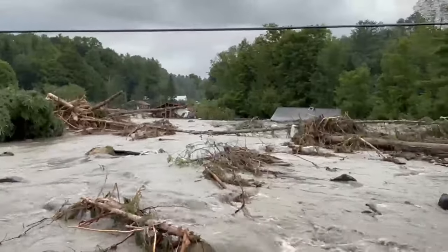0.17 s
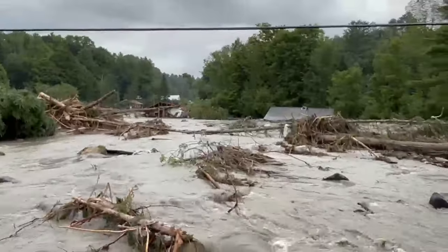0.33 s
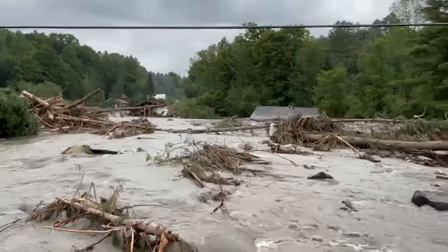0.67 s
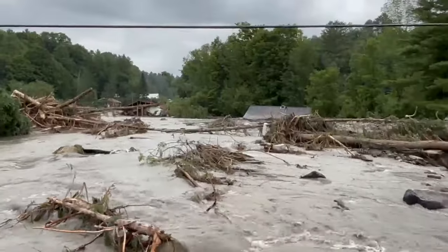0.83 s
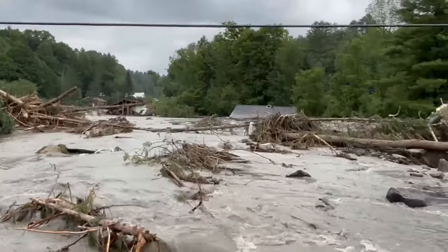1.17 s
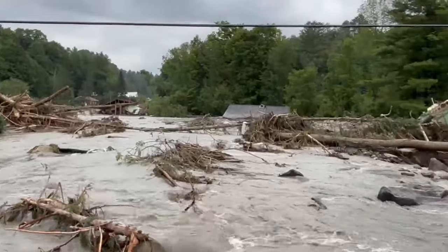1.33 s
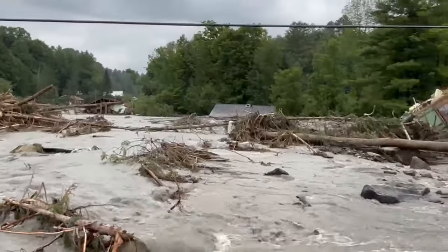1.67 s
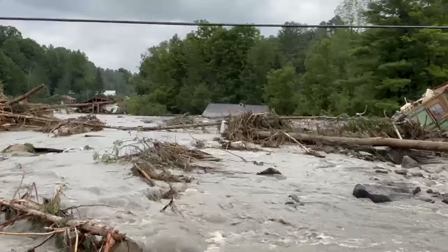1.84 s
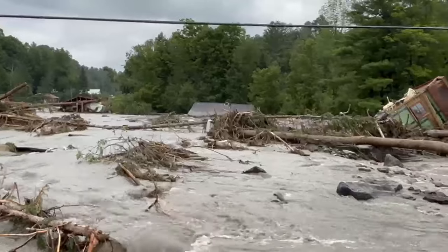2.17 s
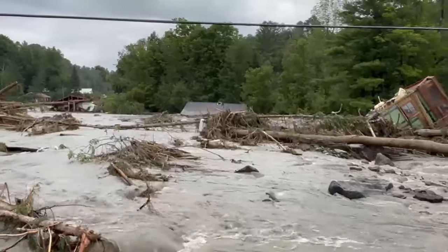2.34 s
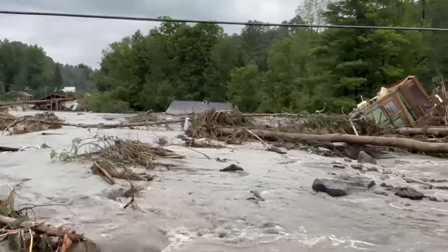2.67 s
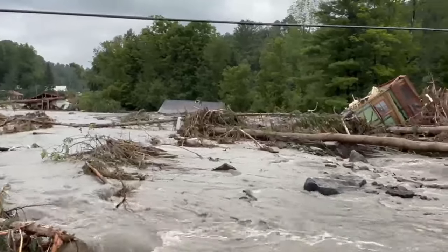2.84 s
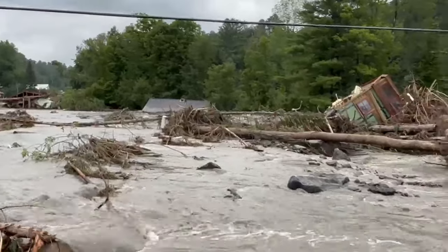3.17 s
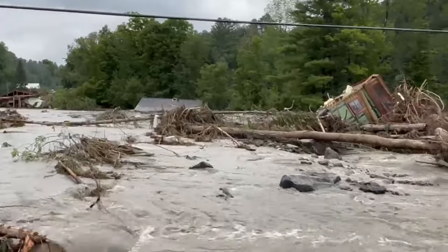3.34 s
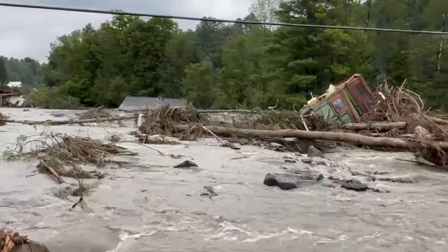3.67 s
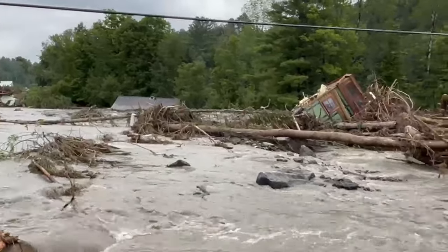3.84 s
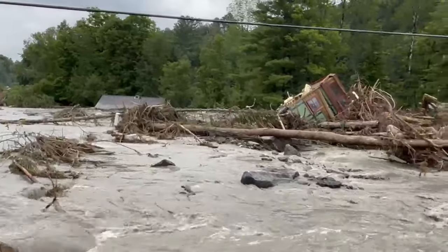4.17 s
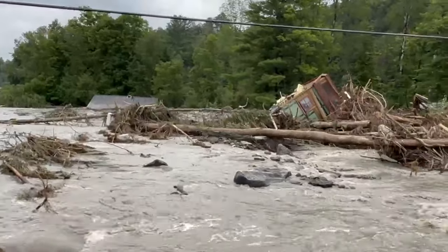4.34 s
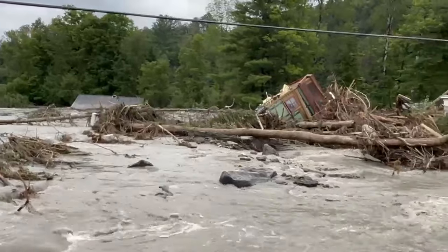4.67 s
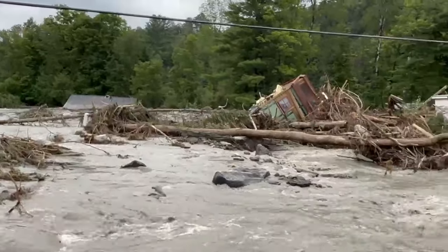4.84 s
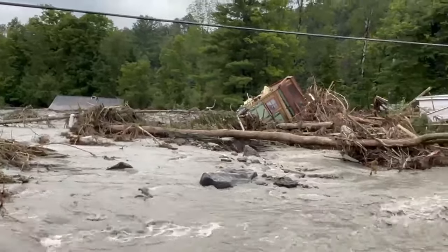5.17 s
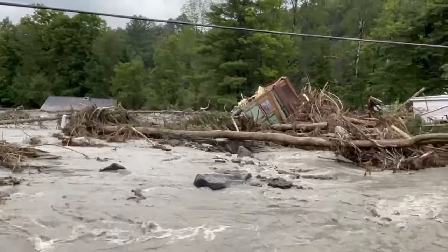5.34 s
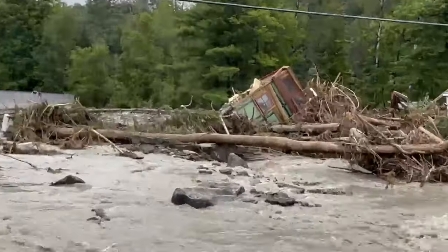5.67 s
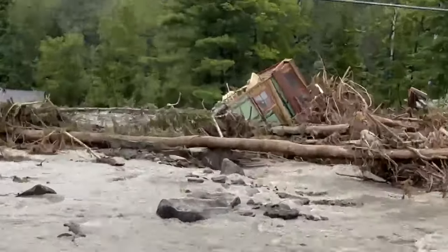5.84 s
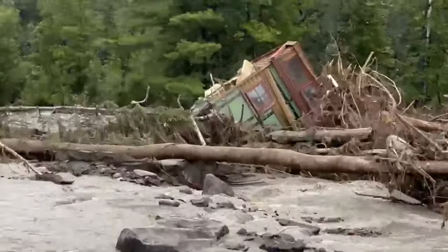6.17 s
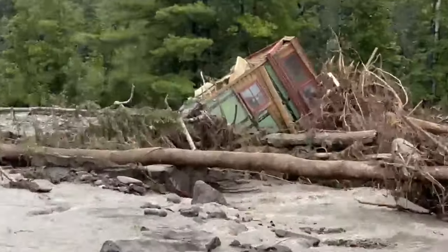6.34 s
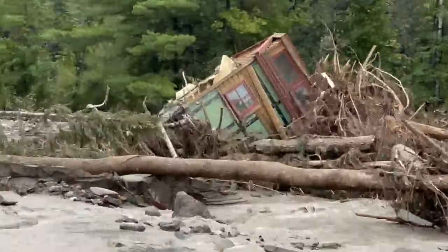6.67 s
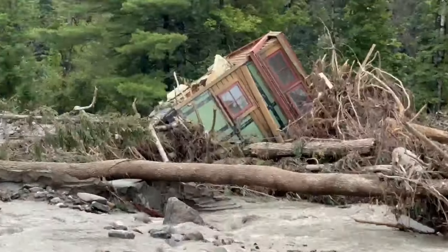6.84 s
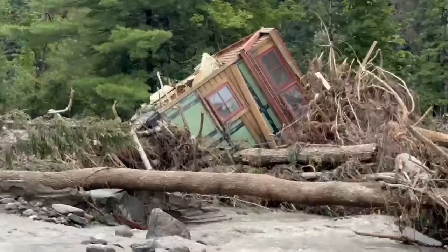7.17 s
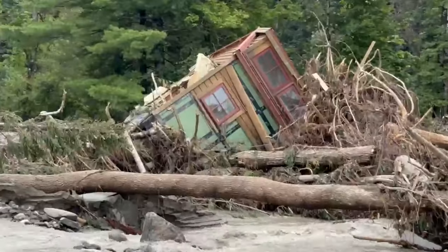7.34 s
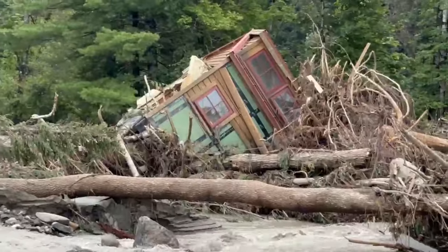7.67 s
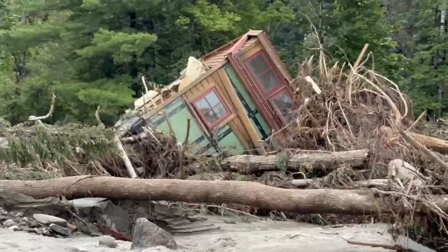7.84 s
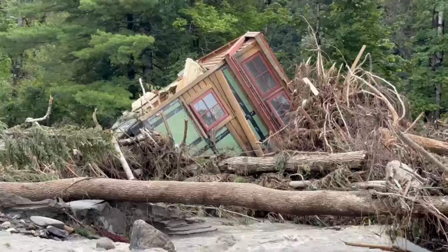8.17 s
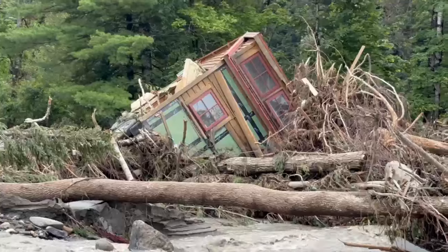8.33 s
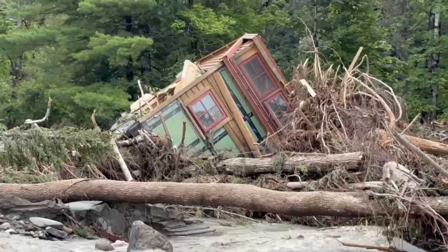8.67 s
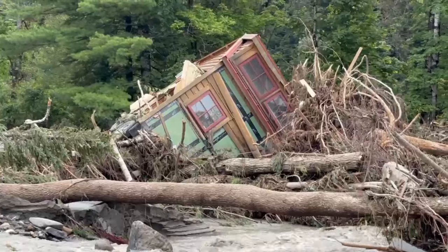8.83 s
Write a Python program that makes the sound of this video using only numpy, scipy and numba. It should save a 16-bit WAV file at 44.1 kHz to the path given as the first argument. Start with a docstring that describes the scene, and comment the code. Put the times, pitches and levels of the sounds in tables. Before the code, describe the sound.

Outdoors on the bank of a flooded street, a handheld phone in stereo captures dense, continuous water hiss with fine bubbling, gurgles, occasional plops and tiny snapping drops. Low wind rumbles on the microphone, bursting into heavy thumps just before three seconds and hardest around seven. Midway the water's image narrows toward the centre and its upper hiss grows clearer.

```python
"""A dense hiss of flood water rushing through debris, from the bank on a hand-held phone with two ports.
The rush is flickering noise with bursting bubbles; gurgles, plops, snaps and thicker patches are dying sines.
Gusts rumble and flutter on the ports as band-passed noise; single eddies thump as sinking sines.
Midway the phone narrows its hearing to the front: the middle treble rises and moves to the centre."""
import sys
import numpy as np
from scipy import signal
from scipy.fft import rfft, irfft, next_fast_len
from scipy.io import wavfile
from scipy.ndimage import uniform_filter1d
from numba import njit

SR = 44100
rng = np.random.default_rng(int(sys.argv[2]) if len(sys.argv) > 2 else 0)


def log_audio(samples):
    """Write samples as a 16-bit WAV file to the path given in sys.argv[1]."""
    # one column per channel
    frames = np.atleast_2d(samples).T
    # limit to full scale, then quantise
    limited = np.clip(frames, -1, 1)
    pcm = np.round(limited * 32767).astype(np.int16)
    wavfile.write(sys.argv[1], SR, pcm)


N = 396880

# single eddies that hit the ports: t/s, peak level/dB, final f/Hz, starting excess as share of f (below 0: none),
# rise to peak/ms, slap level/dB relative to the peak
EDDY_HITS = [(0.54, -31, 74, -1.5, 16, -3), (0.756, -17, 92, 0.5, 10.6, -13), (0.801, -23, 74, 0, 14, -10),
             (0.955, -25, 58, -10, 17, -14), (1.26, -28, 51, 0.5, 17, -5),
             (1.419, -24, 59.3, 2.5, 4.4, -13), (1.64, -33, 70, 2.5, 10, -10),
             (1.72, -27, 75, 1.5, 14, -12), (1.793, -18, 64, 0.5, 12, -12), (2.48, -11.5, 65, 2.0, 14, 0),
             (2.564, -17.5, 58, 3.5, 7, -7), (2.606, -20, 70, -1, 11, -12),
             (2.681, -9.5, 57.6, 4, 5.1, -11), (2.706, -9, 146, 1, 6.6, -9), (2.72, -11, 56, 0.5, 9.2, -16),
             (2.763, -15, 106, 0, 5.4, -20), (2.8, -17, 58, 0.5, 11, -13), (2.849, -21, 74, 1, 12, -15),
             (2.888, -11.5, 65, 0.5, 6.4, -24), (2.932, -20, 50.7, 2.0, 11, -11),
             (2.973, -16.7, 58, 2.5, 8, -6), (3.003, -13, 45, 3, 8.7, -8), (3.071, -23, 65, 4, 5.4, -12),
             (3.113, -23.5, 65, 3, 5.7, -15), (3.177, -25, 106, -1.5, 5, -1), (3.232, -26, 85, 2, 5.1, 0),
             (3.322, -28, 70, 4, 4.1, 2), (3.474, -25, 95, 0, 6.6, -6), (3.579, -27, 65.6, 3, 5, 7),
             (3.752, -25, 74, 4, 5, -11), (4.213, -29, 85, 1.5, 7, 6), (4.235, -32, 75, 0.5, 9, -1),
             (4.262, -18, 50, 4, 6.6, -11), (4.3, -30, 106, 0.5, 5, 5), (4.393, -22.5, 100, -1, 5.5, 2),
             (4.421, -25, 83, 3.0, 7.9, -11), (4.444, -30, 106, -1, 5, -3), (4.518, -28.3, 106, 0.5, 5, -4),
             (5.359, -27, 100, 0.5, 5.2, -4), (5.406, -25, 110, 0.5, 5, -7), (5.45, -34, 70, 1.5, 8, -3),
             (5.749, -24, 74, 0.0, 6.3, -11), (5.82, -26, 80, 2, 5, 0), (5.858, -24.5, 74, 1, 9.1, -8),
             (5.9, -30, 85, 0.5, 7, -6), (5.98, -28, 90, 1.5, 7.4, -4), (6.024, -26, 62, -0.5, 12, 3),
             (6.058, -28, 65, -1, 7, -8), (6.235, -26, 100, 1, 5, -2), (6.27, -27, 65, 1, 8, -6),
             (6.505, -21.5, 74.7, 3.5, 13, -10), (6.53, -17, 72.5, 5, 11.3, -3),
             (6.565, -20, 64.5, 2.0, 17, -16), (6.614, -18.5, 58, 3.0, 11, -11),
             (6.7, -24, 51, 2.5, 5, -11), (6.808, -12, 52, 2.2, 10, -10), (6.834, -11, 51, 3.5, 14, 2.5),
             (6.849, -13.5, 60, 1.5, 11, -5), (6.876, -11.5, 70, 2.5, 8.2, -7),
             (6.927, -24, 90, 1.5, 12, -3), (6.962, -17, 55, 1, 10, -16), (6.99, -12, 58, 2.5, 4.1, -4),
             (7.001, -12, 59, 4, 8.4, -10), (7.008, -2.5, 44, 3, 9.1, -15), (7.022, -12, 44, 0.7, 11, -20),
             (7.044, -17, 80, 1, 7, -5), (7.066, -13, 110, 0.5, 4.5, -2),
             (7.076, -10.5, 49.7, 5.5, 12.6, 7.5), (7.096, -11, 120, 1.5, 5.1, 0),
             (7.116, -17.5, 86, 0.5, 12, -10), (7.15, -24, 110, 0.5, 4.5, -10),
             (7.16, -16, 52, 0.5, 11, -17.5), (7.191, -7.5, 106, 1.0, 5, -8), (7.222, -16.5, 105, 2, 12, 3),
             (7.262, -16.5, 135, 2, 3.8, -6), (7.302, -29.5, 64.7, 2, 15, 9), (7.33, -26, 90, 1.5, 7.7, -1),
             (7.584, -22.5, 89, 3.5, 6.9, -1), (7.732, -25.5, 65, 2, 5.5, 6),
             (7.745, -25, 48, 0.8, 12, -12), (7.91, -25, 83, 0.5, 8, -9), (7.971, -25, 74, -0.5, 4.3, -8),
             (8.02, -28, 70, 0, 8, -4), (8.052, -25, 83, 0.5, 15, -6), (8.173, -29, 86, 4, 12.6, 1),
             (8.125, -36, 75, -0.5, 6, -6), (8.195, -24, 100, 1, 9.9, -6), (8.231, -27.5, 84, 1, 11, 10.5),
             (8.285, -25, 130, 1.5, 6, 2), (8.298, -24, 85, 0.5, 7, -6), (8.331, -25, 90, 0.5, 7.3, 2),
             (8.374, -27, 90, 1, 6, -4), (8.402, -25, 94, 0.5, 10, 5), (8.434, -21.5, 70, 2.5, 5.5, 0),
             (8.462, -24.5, 58, 2, 4.6, 9), (8.52, -30, 70, 0.5, 10, -6), (8.56, -33, 55, 0, 14, -6),
             (8.871, -24.5, 57.6, 4.5, 5.8, 5.5), (8.945, -27, 65, 1.5, 6.2, -3)]


def undb(db):
    """Amplitude ratio of a level in dB."""
    return np.exp(np.asarray(db) * np.log(10) / 20)


def walk(rate):
    """Random levels held 1 / rate s and slewed by two running means; spread near 1."""
    step = 64  # samples per point of the coarse grid
    hold = int(SR / step / rate)
    levels = np.repeat(rng.standard_normal(N // (step * hold) + 2), hold)
    slewed = uniform_filter1d(uniform_filter1d(levels, hold), hold)
    return 1.3 * np.interp(np.arange(N) / step, np.arange(len(levels)), slewed)


def band(x, lo_hz, hi_hz, order=2):
    """Butterworth band-pass."""
    return signal.sosfilt(signal.butter(order, [lo_hz, hi_hz], "bandpass", fs=SR, output="sos"), x)


def unit(x):
    """Scale to an rms of 1."""
    return x / np.sqrt(np.mean(x ** 2))


@njit
def rings(count, at, hz, size, cycles, offset):
    """Each grain is a dying sine that starts off pitch by the share offset and slides home."""
    y = np.zeros(count)
    for k in range(len(at)):
        fade = np.exp(-hz[k] / (cycles[k] * SR))  # falls to 1/e in the given cycles
        phase, left = 0., 1.
        for i in range(min(int(4 * cycles[k] * SR / hz[k]), count - at[k])):
            phase += 2 * np.pi * hz[k] * (1 + offset * left * left) / SR
            left *= fade
            y[at[k] + i] += size[k] * left * np.sin(phase)
    return y


def samples(seconds):
    """Sample numbers of moments in seconds."""
    return (seconds * SR).astype(np.int64)


def water(t, gurgle_db=-18.0):
    """Rush, gurgles and snapping drops, through the wide and then the narrow hearing of the phone."""
    # wide and front-only hearing of the water: f/Hz, level/dB per Hz, left minus right level/dB,
    # likeness of the ports [0-1], right leads [half turns]
    wide_hearing = [(30, -63, 2, .8, -0.14), (100, -63, -1, 1, -0.085), (303, -62, 1, 0.85, -0.15),
                    (850, -62, 1.5, 0.33, -0.18), (1190, -65, 1, 0.07, -0.27), (1388, -62.5, 0, 0.2, 0.47),
                    (1720, -65, 3.5, 0.79, 0.92), (1974, -65, 1, 0.1, 0.47), (2190, -71, 3, 0.64, -0.12),
                    (2550, -72, 5.5, 0.8, -0.12), (2880, -75, 5, 0.36, -0.56), (3280, -75, 4, 0.2, -0.04),
                    (4030, -78, 1, 0.98, -0.26), (4790, -79, 1.5, 0.7, 0.37), (5500, -82.5, 2.5, 0.4, 0.25),
                    (6100, -81, 1, 0.6, 0.25), (6460, -83, 0, 1, 0)]
    front_hearing = [(30, -64, 0, .8, 0), (100, -68, 0.16, 0.57, 0), (306, -65, 0.65, 0.9, -0.12),
                     (746, -61.5, 1.3, 0.75, -0.2), (1140, -65.5, 1.6, 0.55, -0.24),
                     (1520, -66, 2, 0.34, 0.23), (1640, -69, 1.1, 0.33, 0.21),
                     (1910, -66.5, 0, 0.75, -0.057), (2060, -70, 0, 0.99, 0), (2200, -69.7, 0, 1, 0),
                     (3030, -72.3, 0, 1, 0), (4000, -74.6, 0, 1, 0), (5200, -76.8, 0, 1, 0),
                     (5300, -77, 0, 0.81, 0), (6150, -79, 0, 0.85, 0), (6300, -78.5, 0, 1, 0)]
    # passage from wide to front-only hearing: t/s, front share [0-1]
    narrowing = [(5.45, 0), (5.56, 0.35), (5.65, 0.9), (5.74, 1)]
    # drops that snap close by: t/s, starting level/dB above the rush before port colour, final f/Hz
    snaps = [(1.3438, 7, 6940), (1.695, 13, 7390), (2.5067, 5, 7110), (2.6998, 10, 7300),
             (3.6626, 24, 13300)]

    surge_db, lap_db = 0.9 * walk(13), 0.8 * walk(9)
    near, apart = (rush(surge_db, lap_db) for _ in range(2))
    gurgles = bubbles(count=1300, lo_hz=402.0, hi_hz=1690.0, scatter_db=1.33, cycles=5.0)
    near = near + undb(gurgle_db) * gurgles
    s, db, hz = np.transpose(snaps)
    near = near + rings(N, samples(s), hz, undb(db), np.full(len(s), 12.), 0.28)

    narrow = np.clip(np.interp(t, *np.transpose(narrowing)), 0, 1)
    return (1 - narrow) * ports(near, apart, wide_hearing) + narrow * ports(near, apart, front_hearing)


def rush(surge_db, lap_db, fizz_share=0.16):
    """Turbulent hiss with a share of its power in the fizz of many bursting bubbles."""
    hiss = churn(surge_db, lap_db)
    fizz = bubbles(count=24000, lo_hz=615.0, hi_hz=13660.0, scatter_db=2.34, cycles=3.27)
    return np.sqrt(1 - fizz_share) * hiss + np.sqrt(fizz_share) * fizz


def churn(shared_db, lap_db, steady_s=0.16):
    """White rush whose half-octave bands flicker alone; middle and spray lap together, the treble surges."""
    # slow swell of the rush: t/s, gurgling middle level/dB, spray level/dB
    flow = [(0, -0.2, -.5), (.6, 1.5, 0.5), (1.2, 0, 1.5), (2.1, 2, 1), (2.7, 0.5, 0), (3.3, -0.5, 0.5),
            (4.2, 0, 0.5), (4.7, 1, -0.2), (5.4, 0, -1.1), (5.8, 0, -1), (6.4, 0.5, -1.7), (7, -0.6, -1),
            (7.5, -1.2, -1.5), (8.2, 1.5, -1.5), (8.6, -1, -0.5), (9, 0.5, -0.5)]
    s, middle_db, spray_db = np.transpose(flow)
    middle_db, spray_db = (np.interp(np.arange(N) / SR, s, c) for c in (middle_db, spray_db))

    size = next_fast_len(N)
    spectrum = rfft(rng.standard_normal(size))
    hz = np.arange(len(spectrum)) * SR / size
    place = 2 * np.log2(np.maximum(hz, 250) / 250)  # half octaves above 250 Hz
    out = np.zeros(N)
    for k in range(14):
        bright = k / 13
        middle, spray = 2 <= k <= 6, 7 <= k <= 9
        share = np.cos(np.pi / 2 * np.clip(place - k, -1, 1)) ** 2
        flicker_db = 1.1 * (1 - bright) * walk(6)
        flicker_db = flicker_db + (0.95 + 0.22 * bright) * walk(16)
        flicker_db = flicker_db + 0.65 * bright * walk(30)
        flicker_db = flicker_db + bright * shared_db
        # the brighter the band, the steadier its level over more than steady_s
        flicker_db = flicker_db - bright * uniform_filter1d(flicker_db, int(steady_s * SR))
        flow_db = middle * (middle_db + lap_db) + spray * (spray_db + 0.9 * lap_db)
        out += undb(flicker_db + flow_db) * irfft(spectrum * share, size)[:N]
    return unit(out)


def bubbles(count, lo_hz, hi_hz, scatter_db, cycles):
    """Bubbles burst at random, rising in pitch; a few are louder than the rest."""
    when, pitch, luck = rng.random((count, 3)).T
    hz = lo_hz * (hi_hz / lo_hz) ** pitch
    size = hz * undb(-scatter_db * np.log(luck + 0.0033))  # small bubbles, high in pitch, start stronger
    return unit(rings(N, (when * N).astype(np.int64), hz, size, np.full(count, cycles), -0.15))


def ports(near, apart, hearing):
    """Colour, balance, likeness and phase between the two ports, frequency by frequency."""
    # top treble, in either hearing: f/Hz, level/dB per Hz
    treble_level = [(7000, -82.5), (8500, -82), (10000, -85.5), (12500, -87.5), (15500, -85.5)]
    # its image, turning from in step to opposed and back: f/Hz, likeness [0-1], right leads [half turns]
    treble_image = [(7000, 1, 0), (7550, 1, 0), (7650, .8, .15), (9000, .72, .72), (9150, 1, 1),
                    (10800, 1, 1), (10950, .7, 1.3), (11750, .7, 1.8), (11850, 1, 2), (13600, 1, 2),
                    (13750, .68, 2.22), (14500, .68, 2.7), (14650, 1, 3), (17000, 1, 3)]
    hz_top, db_top = np.transpose(treble_level)
    top = [(f, np.interp(f, hz_top, db_top), 0, like, lead) for f, like, lead in treble_image]
    hz, *columns = np.transpose(hearing + top)

    size = next_fast_len(N)
    log_hz = np.log(np.arange(1, size // 2 + 2) * SR / size)
    db, pan_db, like, lead = (np.interp(log_hz, np.log(hz), c) for c in columns)
    like = np.clip(like, 0, 1)
    side = np.array([[1], [-1]])  # left, right
    common = np.sqrt((1 + like) / 2) * rfft(near, size)
    opposed = side * np.sqrt((1 - like) / 2) * rfft(apart, size)
    level = undb(db + side * pan_db / 2) * np.sqrt(SR / 2)
    turn = np.exp(-.5j * np.pi * side * lead)
    return irfft((common + opposed) * (level * turn), size)[:, :N]


def plops():
    """Each large bubble rings a few cycles, rising."""
    # large bubbles that stand out of the rush: t/s, starting level/dB, final f/Hz
    big_bubbles = [(0.878, -25, 640), (1.46, -27, 1300), (1.671, -20, 1340), (1.812, -18.5, 1290),
                   (2.194, -28, 750), (2.254, -29, 770), (2.856, -23, 704), (5.275, -23, 800),
                   (5.774, -24, 716), (5.806, -28, 730), (5.898, -34, 916), (6.101, -24, 760),
                   (6.308, -28, 960), (6.886, -23, 750), (7.578, -31, 700), (7.879, -24, 900),
                   (8.391, -28, 740), (8.529, -24, 810), (8.872, -25, 646)]
    s, db, hz = np.transpose(big_bubbles)
    return band(rings(N, samples(s), hz, undb(db), np.full(len(s), 5.), -0.22), 300., 3000.)


def thick_patches(count=12, length_s=.055, spread_octaves=0.65):
    """Brief thicker patches in the water's grain: a handful of short rising tones around one pitch."""
    # thicker patches: start t/s, starting level/dB of the weakest tones, middle f/Hz
    patches = [(0.33, -36, 780), (0.48, -42, 1630), (0.52, -42, 830), (0.58, -40, 1300), (0.64, -37, 755),
               (0.74, -36, 1150), (1.03, -39, 786), (1.035, -35, 1300), (1.2, -38, 510), (1.98, -42, 1980),
               (2.42, -40, 1460), (3.1, -36, 705), (3.335, -34, 620), (3.675, -33, 775), (3.81, -33, 796),
               (3.99, -45, 1300), (4.56, -45, 1300), (4.62, -37, 870), (4.675, -34, 755),
               (4.765, -38, 1016), (4.975, -35, 614), (5.145, -37, 674), (6.45, -35, 770),
               (7.02, -36, 1290), (8.06, -43, 900), (8.14, -39, 620), (8.21, -39, 1250), (8.3, -34, 563),
               (8.37, -41, 1000), (8.45, -41, 1340)]
    s, db, hz = (np.repeat(c, count) for c in np.transpose(patches))
    when, pitch, luck = rng.random((len(s), 3)).T
    at = samples(s + length_s * when)
    tone_hz = hz * 2 ** (spread_octaves * (pitch - .5))
    return rings(N, at, tone_hz, undb(db + 8.0 * luck), np.full(len(s), 4.), -0.1)


def wind(t, likeness=0.9, lag_s=0.00054):
    """Both ports feel nearly the same gust, the left a moment later; an unlike part is opposed between them."""
    like = np.clip(likeness, 0, 1)
    hits, hits_apart = thumps()
    both = np.sqrt((1 + like) / 2) * eddies(t, -0.38, 36.0) + hits
    own = np.sqrt((1 - like) / 2) * eddies(t, 2.2, 48.0) + hits_apart
    return np.array([np.interp(t - lag_s, t, both) + own, both - own])


def thumps(turn_spread=0.32, choke=0.037, slap_apart=0.25):
    """Each eddy swells and dies, its pitch sinking or level, with a brighter slap; the ports differ a little."""
    both, apart = np.zeros(N), np.zeros(N)
    for (s, db, hz, drop, rise_ms, _), turn in zip(EDDY_HITS, rng.standard_normal(len(EDDY_HITS))):
        at, rise_s = int(s * SR), max(rise_ms, 2) / 1000
        age = np.arange(min(int(8 * rise_s * SR), N - at)) / SR / rise_s  # in rise times
        phase = 2 * np.pi * hz * rise_s * (age + max(drop, 0) * (1 - np.exp(-age)))
        swell = undb(db) * age * np.exp(1 - age - choke * age ** 2)
        both[at:at + len(age)] += swell * np.sin(phase)
        apart[at:at + len(age)] += turn_spread * turn * swell * np.cos(phase)

    s, db, *_, slap_db = np.transpose(EDDY_HITS)
    slap_hz = 240 * 1.54 ** rng.random(len(s))
    lean = slap_apart * rng.standard_normal(len(s))
    slap_at = samples(s + 0.00272)
    slap, slap_side = (rings(N, slap_at, slap_hz, share * undb(db + slap_db), np.full(len(s), 1.7), 0.33)
                       for share in (1., lean))
    return band(both + slap, 24.0, 640.0), band(apart + slap_side, 68.0, 700.0, order=3)


def eddies(t, flutter_gain_db, rumble_lo_hz, lull_db=1.5, wake_flutter_db=-3.5):
    """Port turbulence: a rumble and choppier flutter that follow the breeze and the wakes of the thumps."""
    # breeze on the ports between the thumps: t/s, rumble level/dB, flutter level/dB relative to the rumble
    # (rumble before the random lulls and swells, flutter before its gain; both before the last filter)
    gusts = [(0.0, -35, -2), (0.7, -33, -6), (1.1, -36.5, -1), (1.35, -33.5, -6), (1.65, -30.5, -7),
             (1.95, -38.5, -0.5), (2.45, -30, -7), (2.66, -32, -4), (3.0, -36, -8), (3.1, -39.5, 2),
             (3.55, -42, 4), (4.05, -51, 7.5), (4.2, -36, -1), (4.33, -45.5, 5), (4.45, -38, 8.5),
             (4.58, -57, 2), (5.2, -54, 9), (5.36, -44, 0), (5.47, -40, 4), (5.53, -45, 5), (5.7, -34, 0.5),
             (5.9, -36.5, 0.5), (6.2, -36, -4), (6.33, -32, -5), (6.46, -30.5, -7), (6.55, -30, -5),
             (6.75, -34, -0.5), (6.92, -30, 2), (7.1, -37, 4), (7.3, -34, -5), (7.42, -37, -22),
             (7.55, -39, -10), (7.85, -39.5, 0.5), (8.0, -37, 3), (8.25, -38.5, 5), (8.47, -39, 3),
             (8.55, -37, -4), (8.62, -41, -7), (8.68, -55, -1), (8.84, -52, -8), (9.0, -32, 4)]
    s, rumble_db, flutter_db = np.transpose(gusts)
    breeze = undb(np.interp(t, s, rumble_db) + lull_db * walk(12))
    buffet_db = 1.5 * walk(25)
    rumble = unit(undb(buffet_db) * band(rng.standard_normal(N), 34.0, 91.4))
    chop_db = 1.5 * buffet_db + 2.1 * walk(40)
    flutter = unit(undb(chop_db) * band(rng.standard_normal(N), 129.0, 327.0))

    trail = wake(t)
    breeze_flutter = undb(np.interp(t, s, rumble_db + flutter_db))
    flutter_level = undb(flutter_gain_db) * np.hypot(breeze_flutter, undb(wake_flutter_db) * trail)
    return band(np.hypot(breeze, trail) * rumble + flutter_level * flutter, rumble_lo_hz, 840.0, order=3)


def wake(t, below_peak_db=-13.5, rise_s=0.0083, fall_s=0.028):
    """Level of the turbulence that swells just before each thump and trails after it; powers add."""
    s, db = np.transpose(EDDY_HITS)[:2]
    coarse = t[::64]
    late = coarse - s[:, None]
    shape = np.exp(-2 * np.where(late > 0, late / fall_s, -late / rise_s))
    return np.interp(t, coarse, np.sqrt(undb(2 * (db + below_peak_db)) @ shape))


def scene():
    """Water, plops and thicker patches in front of the bank, and the wind on the ports."""
    t = np.arange(N) / SR
    return water(t) + plops() + thick_patches() + wind(t)


def record(dry, bass_hz=40., top_hz=15850):
    """The phone cuts the deepest bass and the top."""
    dry = signal.sosfilt(signal.butter(2, bass_hz, "highpass", fs=SR, output="sos"), dry)
    return signal.sosfilt(signal.ellip(10, .2, 80, top_hz, fs=SR, output="sos"), dry)


dry = scene()
out = record(dry)
log_audio(out)
```